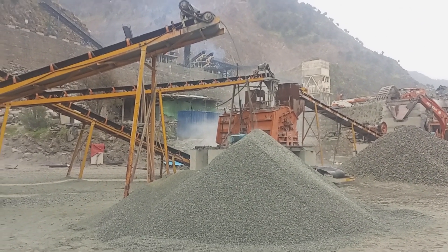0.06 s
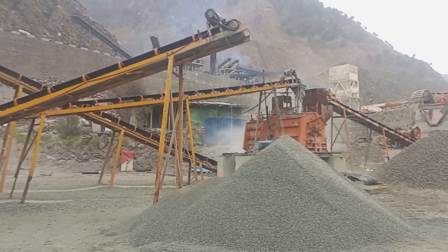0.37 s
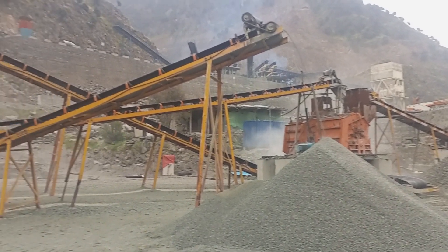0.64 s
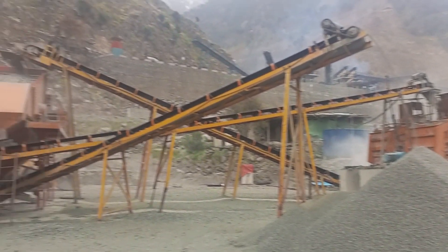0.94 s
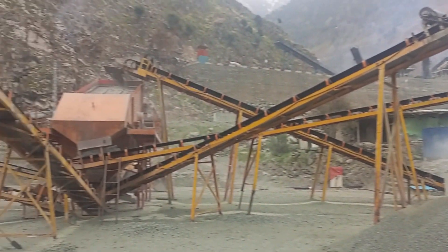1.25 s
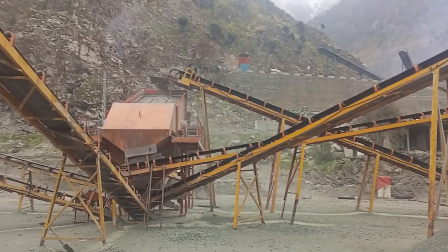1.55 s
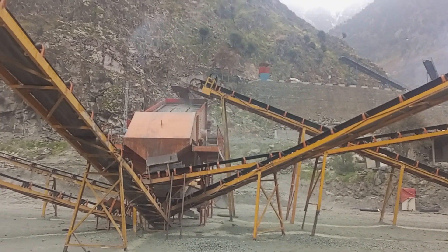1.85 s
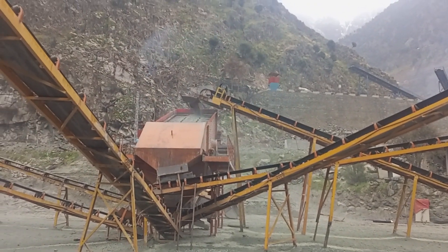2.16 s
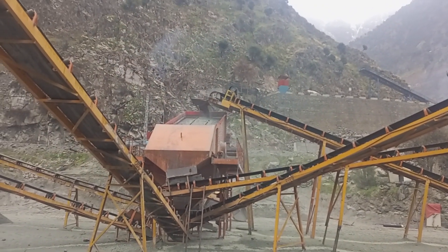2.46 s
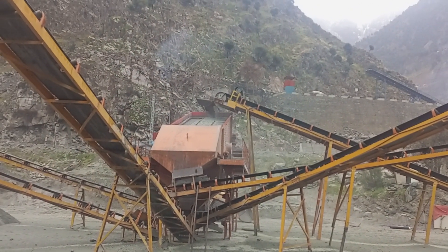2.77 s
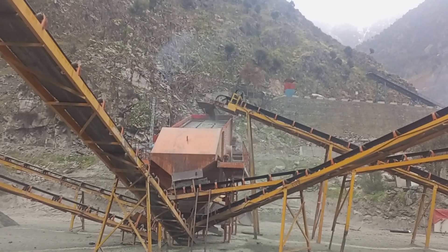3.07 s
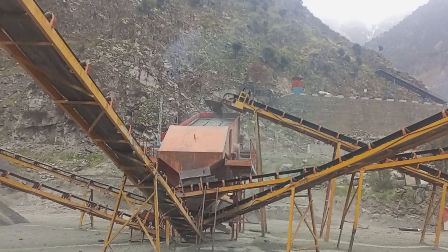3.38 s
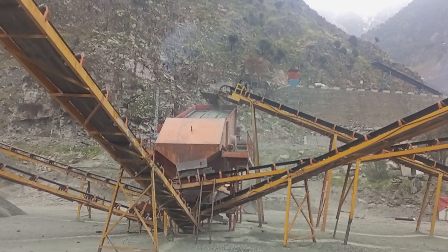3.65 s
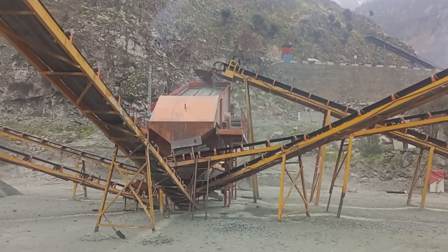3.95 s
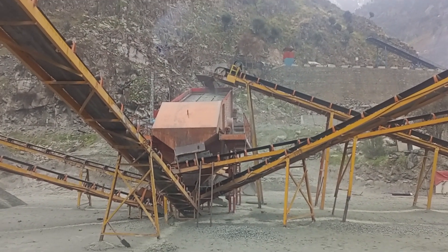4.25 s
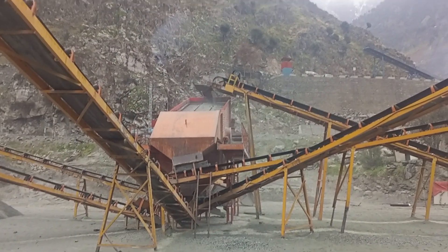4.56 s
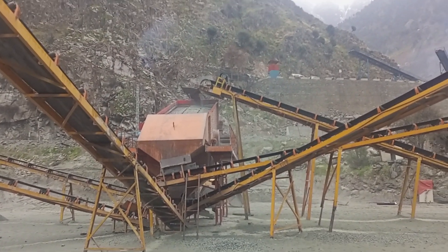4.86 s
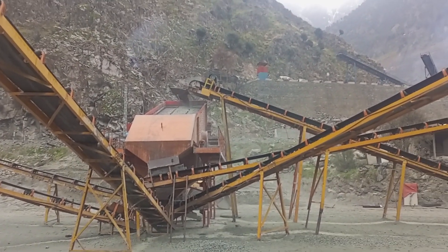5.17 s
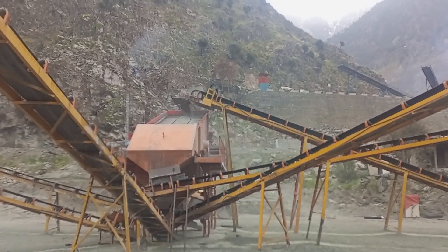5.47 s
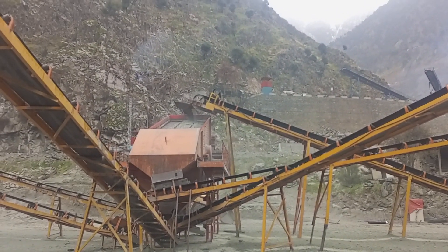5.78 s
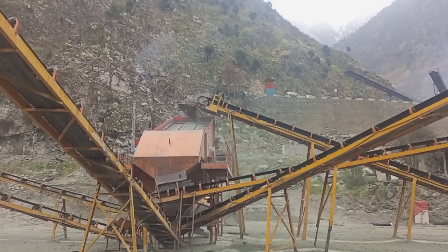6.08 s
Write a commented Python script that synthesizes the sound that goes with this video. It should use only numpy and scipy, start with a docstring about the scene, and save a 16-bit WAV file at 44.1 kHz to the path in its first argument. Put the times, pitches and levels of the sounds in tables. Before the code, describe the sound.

Continuous rumble of a rock crushing plant, with fast pulsing stone clatter, ringing steel, pouring gravel and a low machine hum.

```python
"""Stone crushing plant in a valley

A crusher roars, a shaking screen tosses stones on its steel deck, and gravel hisses off the belts.
Behind them, motors and drives drone and beat. A hand around the microphone forms a hollow that rings;
near 4 s the grip shifts, the fingers rub softly and the hollow's pitch slides up."""
import sys
import numpy as np
from scipy import signal
from scipy.fft import rfft, irfft
from scipy.io import wavfile
from scipy.ndimage import uniform_filter1d, minimum_filter1d

SR = 44100
rng = np.random.default_rng(int(sys.argv[2]) if len(sys.argv) > 2 else 0)


def transcribe(u):
    """Save the signal u as a 16-bit wav file named by the first command-line argument.

    u: samples, shape (n,) or (channels, n), limited to [-1, 1]; the rate is SR.
    q: integer samples, one column per channel.
    """
    v = np.clip(np.atleast_2d(u).T, -1, 1)
    q = np.round(v * 32767).astype(np.int16)
    wavfile.write(sys.argv[1], SR, q)


N = 274302
TIME = np.arange(N) / SR
FREQS = np.maximum(np.arange(N // 2 + 1) * SR / N, 1)

# how hard the crusher works: (time [s], relative level [dB])
CRUSHER_LOAD = [(0, -22), (1.2, -23), (3.0, -22.6), (3.9, -24), (4.5, -26.5), (5.4, -25.2), (5.8, -24.0),
                (6.22, -25.5)]
# tone of the roar with a loose and a close grip: (frequency [Hz], relative level [dB])
ROAR_TONE_LOOSE = [(20, -48), (46, -33), (64, -1), (105, -3), (150, 1.5), (230, 0), (360, 2), (470, -2),
                   (600, 2.5), (750, 4), (1030, 0), (1200, 3.5), (2200, -2), (2900, -2.5), (8000, -55)]
ROAR_TONE_CLOSE = [(20, -31), (46, -21), (64, -4), (105, 2), (160, 3), (230, 4), (360, 5), (465, -3.5),
                   (590, 6.5), (780, 5.5), (1050, -1.5), (1230, -1), (1500, -2), (2700, 9.5), (11000, -82)]
# stone flow over the screen: (time [s], flow for the clatter [dB], flow for the deck's ring [dB])
STONE_FLOW = [(0, -13, -19), (0.6, -14.5, -18), (0.9, -14, -20), (1.2, -14.5, -22), (2.1, -16, -22.5),
              (2.8, -16.0, -23.0), (3.2, -17.5, -32), (3.7, -17, -31), (3.82, -13, -19), (4.1, -12, -13),
              (4.7, -13.5, -11), (6.22, -12.5, -13)]
# heaps of stone drop on the deck: (time [s], swell of its ring [dB])
HEAP_DROPS = [(0.225, 4.5), (0.805, 7), (0.87, 6), (1.37, 5), (2.32, 3), (2.73, 11), (2.85, 0), (3.31, 20),
              (5.53, 6), (5.87, 6)]
# the clatter and gravel dip briefly: (time [s], level change [dB])
STONE_DIPS = [(3.25, -4), (3.542, -3), (4.566, -7)]
# ringing notes of the steel deck and the chute below: (frequency [Hz], width [Hz], relative level [dB])
DECK_NOTES = [(2291, 55, 3), (2450, 60, -2), (2528, 26, 2.5), (2740, 130, -5), (2920, 60, -3),
              (2997, 50, 2), (3075, 70, -4), (3190, 35, -5)]
CHUTE_NOTES = [(1440, 45, -2), (1717, 28, 0), (1800, 65, 0)]
# single large stones crack: (time [s], relative level [dB])
STONE_CRACKS = [(0.4294, -17), (0.7876, -14), (1.485, -14), (2.329, -14), (2.7087, -16), (2.728, -13),
                (3.1033, -14), (3.8432, -15), (4.1144, -24), (4.4278, -11.5), (5.0704, -14), (5.5079, -14)]
# gravel pours off the belts: (time [s], relative level [dB])
GRAVEL_POUR = [(0, -29.5), (0.3, -31.5), (1.1, -33), (1.7, -33), (3.1, -33.5), (3.45, -30), (3.8, -31),
               (4.6, -33), (4.85, -30), (6.22, -30.5)]
# tone of its hiss with a loose and a close grip: (frequency [Hz], relative level [dB])
HISS_TONE_LOOSE = [(2600, -5.5), (3700, 6), (4150, 6), (4700, -1), (5600, -1), (6500, 4), (7300, -3.5),
                   (8100, -18.5), (9700, -30), (10400, -23), (12200, -45), (13800, -41), (14800, -26),
                   (16000, -30)]
HISS_TONE_CLOSE = [(2000, -26), (3300, -5.5), (4000, -1.5), (4800, -1.5), (5600, 0), (6600, 2.5), (7400, 0),
                   (8500, -6.5), (9900, -21.5), (11000, -20.5), (13600, -26), (14800, -20), (16000, -24)]
# drives and shaking frames: (frequency [Hz], level at average load [dB], wobble [share of strength])
DRIVE_HUMS = [(33.2, -70, .3), (66.4, -45, .2), (75.1, -43.5, .15), (84.7, -51, .3), (93.6, -47.5, .25),
              (99.6, -46, .25), (118.5, -51, .5), (132.8, -47, .4), (169.6, -40.3, .45), (212.6, -49.5, .5),
              (245.5, -46.5, .5), (310.9, -41.3, .6)]
# the hollow of the hand: (time [s], pitch [Hz], grip [0 loose to 1 close])
HAND_HOLLOW = [(0, 1695, 0.059), (1.0, 1760, 0.15), (3.0, 1756, 0.099), (3.7, 1820, 0.086),
               (3.85, 2030, 0.13), (4.03, 2230, 0.59), (4.22, 2700, 0.63), (4.6, 2650, 0.79),
               (4.9, 2410, 0.67), (6.22, 2380, 0.83)]
# tone of the rubbing fingers: (frequency [Hz], relative level [dB])
RUB_TONE = [(5000, -20), (8800, 7), (12000, -14), (15000, 2)]


def crusher(load_db, grip):
    """Rock tumbling in the crusher blends into a smooth roar, a little louder with a close grip."""
    tumbling = impacts(per_s=3900, spread_db=3, fade_s=.093)
    return from_db(load_db + 2 + 2 * grip) * gripped(tumbling, ROAR_TONE_LOOSE, ROAR_TONE_CLOSE, grip)


def clatter(clatter_db, deck_db, toss_db, cracking, hollow_hz, grip):
    """Stones hit each other, the chute and the deck; the hand's hollow colours the first two."""
    blows = impacts(per_s=980, spread_db=-.5, fade_s=.03) * from_db(.5 * toss_db)
    blows = rms_one(blows + from_db(-19) * cracking)
    chute = steel(impacts(per_s=850, spread_db=.5, fade_s=.019), CHUTE_NOTES)
    stones = rms_one(hollow(blows, hollow_hz, grip) + .45 * hollow(chute, hollow_hz, grip))
    deck_knocks = impacts(per_s=1400, spread_db=2.5, fade_s=.0039) * from_db(.68 * toss_db)
    return from_db(clatter_db) * stones + from_db(deck_db) * steel(deck_knocks, DECK_NOTES)


def feed(grip, usual_flow_db=-15, usual_ring_db=-18.5):
    """Levels of the clatter and the deck's ring: both rise with the flow, in bunches and with heaps."""
    flow_db, ring_db = in_time(STONE_FLOW)
    bunch_db = .65 * drift(per_s=9.7)   # the stones arrive unevenly
    heap_db = swells(HEAP_DROPS, half_s=.026)
    clatter_db = -19.5 + 1.33 * (flow_db - usual_flow_db) + .075 * heap_db
    deck_db = -21.5 + 1.8 * (ring_db - usual_ring_db) + heap_db
    deck_db -= 14.5 * grip   # a close grip shields the deck's ring
    return clatter_db + bunch_db, deck_db + bunch_db


def screen_toss(turns_per_s=12.47, first_toss_s=.012):
    """The screen throws its load once a turn, never quite the same amount, so the level swings."""
    return .85 * np.cos(2 * np.pi * turns_per_s * (TIME - first_toss_s)) + 1.06 * drift(per_s=26)


def steel(knocks, notes):
    """Knocks make a steel plate ring at its own notes."""
    ring = np.zeros(N)
    for hz, width, db in notes:
        near_note = signal.lfilter(*resonator(hz, 6 * width), knocks)
        ring += from_db(db) * signal.lfilter(*resonator(hz, width), near_note)
    return rms_one(ring)


def cracks(fade_s=.092):
    """Large stones split, each with a sharp burst of noise that dies quickly."""
    strength = np.zeros(N)
    for start_s, db in STONE_CRACKS:
        start = int(start_s * SR)
        age = TIME[:N - start]
        strength[start:] += from_db(db + 21 - 60 * np.minimum(age / fade_s, 3))
    return strength * rng.standard_normal(N)


def gravel(pour_db, toss_db, cracking, grip):
    """Fine chips patter and hiss with every throw of the screen; flinty ones tick brightly."""
    chips = impacts(per_s=2100, spread_db=-4, fade_s=.058) * from_db(.76 * toss_db) + cracking
    ticks = impacts(per_s=200, spread_db=3, fade_s=.025) * from_db(1.1 * toss_db) + .9 * cracking
    bright = rms_one(np.diff(ticks, n=2, prepend=[0, 0]))   # a hard, brief hit favours the treble
    hiss = gripped(rms_one(chips) + from_db(1) * bright, HISS_TONE_LOOSE, HISS_TONE_CLOSE, grip)
    return from_db(pour_db + 2 - 1.5 * grip) * hiss


def drives(load_db):
    """Unbalanced shafts hum; the two lowest strong hums beat about nine times a second."""
    hum = np.zeros(N)
    for hz, db, wobble in DRIVE_HUMS:
        sway = 1 + wobble * (drift(per_s=1.3) + 1j * drift(per_s=5.8))   # strength and timing wander
        turning = np.exp(2j * np.pi * (hz * TIME + rng.random()))
        hum += from_db(db) * rms_one(np.real(sway * turning))
    return hum * from_db(.5 * (load_db - load_db.mean()))


def finger_rub(middle_s=4.23, half_s=.36, level_db=-43):
    """Skin slides on the microphone's case: a faint, fine hiss that swells and fades."""
    hiss = coloured(impacts(per_s=1500, spread_db=11, fade_s=.03), RUB_TONE)
    return from_db(level_db) * np.exp(-((TIME - middle_s) / half_s) ** 2) * hiss


def hollow(sound, hz, grip, block=256):
    """The air in the cupped hand rings and favours sound near its moving pitch."""
    width_hz = 578 + 220 * grip   # a close grip damps the ringing
    out, state = np.zeros(N), np.zeros((2, 2))
    for i in range(0, N, block):
        band = np.concatenate(resonator(hz[i], width_hz[i]))
        out[i:i + block], state = signal.sosfilt([band, band], sound[i:i + block], zi=state)
    return rms_one(out / np.sqrt(width_hz))   # a wider band does not get louder


def gripped(sound, loose, close, grip):
    """The tone blends from loose to close as the hand tightens."""
    return (1 - grip) * coloured(sound, loose) + grip * coloured(sound, close)


def impacts(per_s, spread_db, fade_s):
    """Random hits of uneven size, each a crunch that falls by 60 dB in fade_s."""
    sizes = from_db(spread_db * np.minimum(rng.exponential(1, N), 4))
    hits = (rng.random(N) < per_s / SR) * sizes ** 2
    energy = signal.lfilter([1], [1, -from_db(-120 / (fade_s * SR))], hits + 1e-18)
    return rms_one(np.sqrt(energy) * rng.standard_normal(N))


def resonator(hz, width):
    """A filter that lets through a band around one pitch."""
    r = np.exp(-np.pi * width / SR)
    return (1 - r * r) / 2 * np.array([1, 0, -1]), [1, -2 * r * np.cos(2 * np.pi * hz / SR), r * r]


def coloured(sound, tone):
    """Shape a sound's lows and highs with a tone table, at strength 1."""
    hz, db = np.transpose(tone)
    gain = from_db(np.interp(np.log(FREQS), np.log(hz), db))
    return rms_one(irfft(rfft(sound) * gain, N))


def drift(per_s, size=4096):
    """A smooth random wander of strength 1 that changes about per_s times a second."""
    hz = np.arange(size // 2 + 1) * SR / N
    slow = irfft(rfft(rng.standard_normal(size)) / (1 + (hz / per_s) ** 2))
    return np.interp(TIME, np.linspace(0, N / SR, size), rms_one(slow))


def swells(rows, half_s):
    """A bell-shaped rise or dip in decibels at each listed time."""
    return sum(db * np.exp(-((TIME - middle_s) / half_s) ** 2) for middle_s, db in rows)


def in_time(rows):
    """Join a table's points with straight lines: one curve for each column after the time."""
    times, *columns = np.transpose(rows)
    return [np.interp(TIME, times, column) for column in columns]


def from_db(db):
    """Turn decibels into a number to multiply by."""
    return 10 ** (np.asarray(db) / 20)


def rms_one(sound):
    """Scale a sound to an average strength (rms) of 1."""
    return sound / np.sqrt(np.mean(sound ** 2) + 1e-20)


def scene():
    """All the machines together, heard from the yard."""
    (load_db,), (pour_db,) = in_time(CRUSHER_LOAD), in_time(GRAVEL_POUR)
    hollow_hz, grip = in_time(HAND_HOLLOW)
    clatter_db, deck_db = feed(grip)
    toss_db, cracking = screen_toss(), cracks()
    stones = clatter(clatter_db, deck_db, toss_db, cracking, hollow_hz, grip)
    stones += gravel(pour_db, toss_db, cracking, grip)
    stones *= from_db(swells(STONE_DIPS, half_s=.0091))
    return (drives(load_db) + crusher(load_db, grip) + stones + finger_rub())[None]


def record(dry, ceiling=.62, cutoff_hz=15750):
    """A quick limiter turns down the loudest peaks, then the highest treble is cut."""
    gain = minimum_filter1d(ceiling / np.maximum(abs(dry), ceiling), size=129)
    limited = dry * uniform_filter1d(gain, size=129)
    return signal.sosfilt(signal.ellip(12, .1, 90, cutoff_hz, fs=SR, output="sos"), limited)


dry = scene()
out = record(dry)
transcribe(out)
```